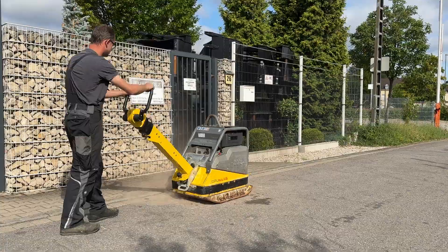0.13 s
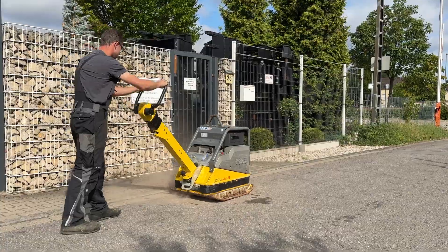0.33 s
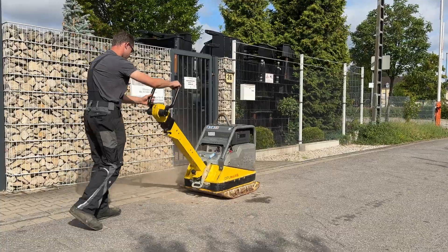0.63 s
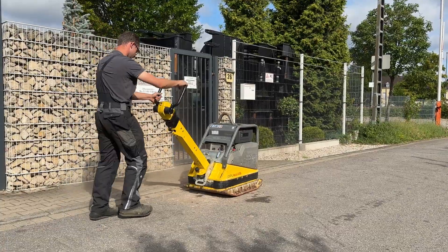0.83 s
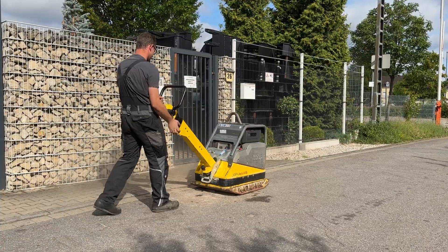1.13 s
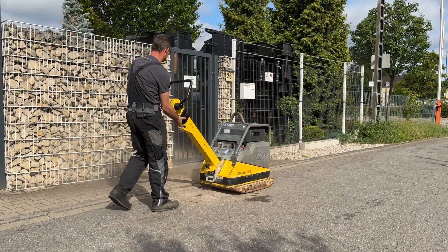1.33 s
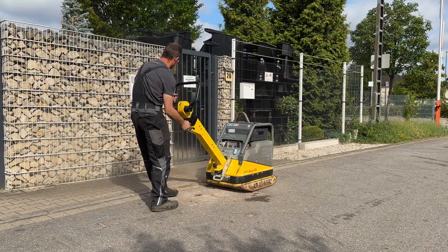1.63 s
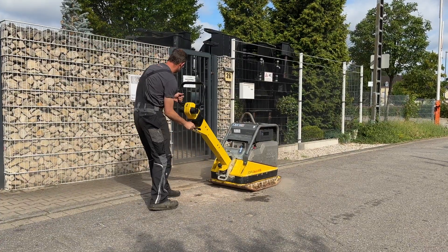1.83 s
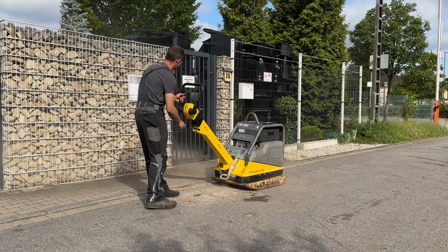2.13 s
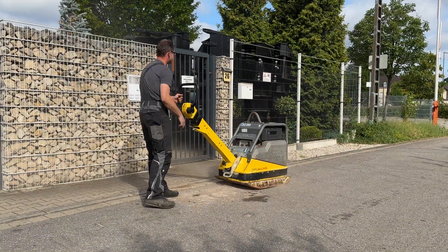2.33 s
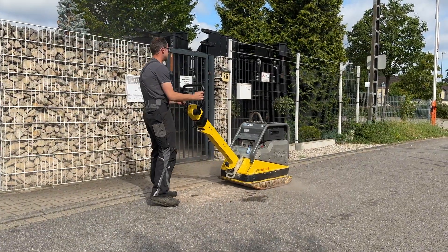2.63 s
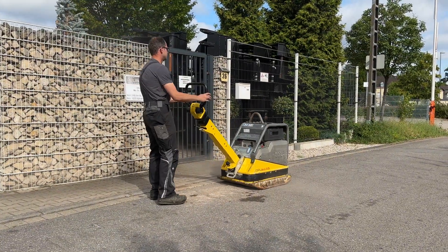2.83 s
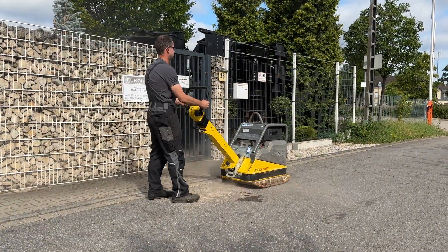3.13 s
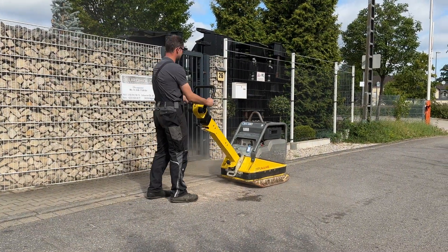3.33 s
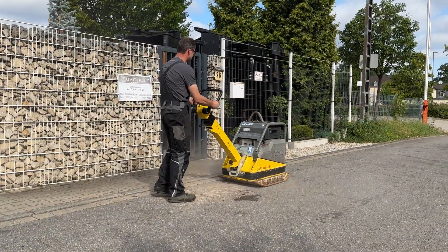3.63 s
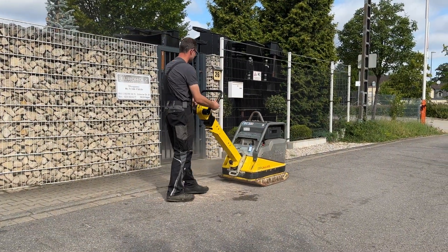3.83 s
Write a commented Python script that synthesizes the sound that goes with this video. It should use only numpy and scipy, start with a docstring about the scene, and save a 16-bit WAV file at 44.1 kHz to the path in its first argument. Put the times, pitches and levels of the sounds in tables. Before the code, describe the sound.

A diesel plate compactor pounds paving a few metres away, steel plate slapping and ringing unevenly over a low hum; after two seconds it winds down to a chugging idle, outdoors by a stone wall, phone microphone.

```python
"""Plate compactor, throttle closed

A diesel plate compactor hammers paving beside a stone wall, a few metres from a phone with two ports.
Its spinning weight hums as a sine; the steel plate slaps unevenly, ringing decaying modes.
Filtered noise bursts give each blow its clatter, grit and thud. The throttle is closed: the weight
slows, the plate settles, and the single cylinder is left idling in knocks, exhaust thumps and hiss.
"""
import sys
import numpy as np
from scipy import signal
from scipy.fft import rfft, irfft
from scipy.io import wavfile
from scipy.ndimage import uniform_filter1d

SR = 44100
rng = np.random.default_rng(int(sys.argv[2]) if len(sys.argv) > 2 else 0)


def pcm_store(signal):
    """Save signal as 16-bit PCM."""
    levels = np.round(np.clip(np.atleast_2d(signal), -1, 1) * 32767)
    wavfile.write(sys.argv[1], SR, levels.astype(np.int16).T)


N = 176400  # samples, four seconds

# Far traffic. Each row: frequency in Hz, relative level in dB.
STREET_SPECTRUM = [(20, -31), (40, -12.5), (150, -2.5), (400, -20.5), (1030, -15.5), (1500, -27),
                   (2600, -29), (3600, -40.5), (15000, -58)]
# Engine. Each row: time in seconds, firings per second in Hz, level in dB.
ENGINE_COURSE = [(0, 24, -36.5), (1.9, 24, -35), (2.6, 18, -46.5), (3.3, 14.6, -38.5), (3.6, 14.2, -45.5),
                 (4, 14.1, -50.5)]
# Exhaust thump. Each row: frequency in Hz, relative level in dB.
EXHAUST_SPECTRUM = [(30, -6), (70, 6), (143, 2), (220, 0), (400, -25), (1000, -19.5), (4000, -50)]
# Gas jet at the exhaust. Each row: frequency in Hz, relative level in dB.
HISS_SPECTRUM = [(1000, -12), (2500, 0), (5000, -7), (10000, -5), (16000, -10)]
# Knock of the engine block. Each row: frequency in Hz, relative level in dB.
KNOCK_SPECTRUM = [(500, -35.5), (900, 1), (1150, 3), (1450, -6), (2200, -15.5), (3000, -14.5), (4000, -41)]
# Spinning weight. Each row: time in seconds, turns per second in Hz, hum level in dB.
WEIGHT_COURSE = [(0, 58.78, -28), (1.2, 58.71, -29), (1.35, 60.1, -26.5), (1.75, 59.14, -28),
                 (2.03, 58.42, -29), (2.25, 54.22, -36.5), (2.6, 50.94, -35.5), (2.9, 46.86, -39),
                 (3.3, 35.02, -65), (3.7, 28.06, -75), (4, 24, -72)]
# Running chatter between the hard slaps, before the chatter gains.
# Each row: time in seconds, ring level in dB, grit level in dB, thud level in dB.
CHATTER_COURSE = [(0.0, -10.5, -30, -19), (0.02, -26.5, -65, -24.5), (0.07, -36, -54, -28.5),
                  (0.109, -10.5, -39, -19), (0.149, -17, -35.5, -22.5), (0.18, -14, -37, -22),
                  (0.26, -14.5, -36, -18.5), (0.32, -22, -42.5, -30), (0.41, -10.5, -37, -17.5),
                  (0.49, -29, -50, -34.5), (0.6, -18, -36.5, -24.5), (0.66, -22.5, -42, -47),
                  (0.7, -17.5, -42, -23), (0.78, -25, -44, -27.5), (0.94, -18.5, -41.5, -25.5),
                  (1.04, -25, -41, -24.5), (1.08, -18.5, -41, -26), (1.56, -19, -44.5, -28),
                  (1.699, -25, -51, -31), (1.719, -13, -41, -26), (1.82, -38, -52, -34),
                  (1.91, -25, -50.5, -25), (1.98, -18.5, -40.5, -41), (2.0, -25.5, -52, -23),
                  (2.06, -19.5, -50, -26.5), (2.13, -38.5, -47, -30), (2.218, -12.5, -37.5, -27),
                  (2.31, -17.5, -41, -23), (2.54, -22.5, -46.5, -29.5), (2.57, -15, -49, -23),
                  (2.6, -24, -47, -20.5), (2.66, -22, -47.5, -35), (2.76, -20.5, -45.5, -29),
                  (2.81, -26, -52.5, -30.5), (2.9, -22, -47, -34), (2.99, -28.5, -56, -25.5),
                  (3.07, -15, -40, -26), (3.26, -26, -49, -26.5), (3.31, -20.5, -44, -24),
                  (3.39, -22.5, -43, -28.5), (3.41, -20, -40.5, -19.5), (3.5, -23, -52, -26.5),
                  (3.56, -21.5, -43, -24), (3.72, -49, -80.5, -34)]
# Hard slaps, before the slap gains. Each row: time in seconds, peak in dB, lowest modes in dB
# against the peak, second low modes in dB against the peak, grit in dB, thud in dB.
HARD_SLAPS = [(0.086, -13, -21, -10.5, -43, -23.5), (0.102, -8.5, -16, -15, -32, -16),
              (0.115, -6, -15, -7.5, -36, -19.5), (0.135, -7.5, -23, -7, -33, -18.5),
              (0.224, -10.5, -12.5, -16, -33, -20.5), (0.346, -7.5, -8.5, -14, -37, -23),
              (0.413, -9.5, -7, -20, -34, -17), (0.523, -13.5, -7, 0.5, -36, -28.5),
              (0.57, -15, -7, 0.5, -45, -24), (0.642, -11, -12.5, -12, -38, -34),
              (0.687, -11.5, -19, -8, -38, -19.5), (0.735, -13, -5.5, -9.5, -34, -24.5),
              (0.823, -15.5, -1, -6, -36.5, -21), (0.886, -13, -13.5, -8, -42, -31),
              (0.905, -7.5, -12, -12, -38, -27), (0.987, -20, -12, -10, -40, -21.5),
              (1.04, -20.5, -10, -15, -35.5, -24.5), (1.077, -15.5, -16, -7, -34.5, -19),
              (1.105, -12.5, -16, -13, -34, -20), (1.142, -14.5, -13, -6, -36.5, -19.5),
              (1.228, -11.5, -10.5, -17, -34, -21), (1.286, -16.5, -6.5, -8, -43, -25.5),
              (1.344, -14.5, -0.5, -11.5, -36, -26.5), (1.443, -12.5, -6, -11, -43, -25),
              (1.494, -9.5, -8.5, -15, -36, -32), (1.545, -13, -7, -16, -34.5, -25),
              (1.644, -11, -15.5, -4, -40, -28.5), (1.703, -13, -13.5, -0.5, -36, -23.5),
              (1.778, -17.5, -7.5, -2, -41.5, -18), (1.831, -23, 3, 4, -44.5, -25.5),
              (1.895, -13, -17, -6.5, -43, -23), (1.929, -12.5, -19, -11, -40, -26.5),
              (1.948, -8, -14, -12, -38, -26), (2.046, -17.5, -2.5, -14, -43, -18.5),
              (2.067, -15, -11, -20, -44, -23.5), (2.158, -18, -4, -16, -42, -31.5),
              (2.175, -14.5, -6, -4, -35, -23.5), (2.212, -6, -16.5, -7.5, -37, -25),
              (2.285, -15, -10, -11.5, -39, -32), (2.304, -14, -9.5, -5, -38, -28.5),
              (2.327, -11.5, -12, -9, -37, -29), (2.472, -22.5, -12, -6.5, -38.5, -28),
              (2.56, -11, -15.5, -14, -44, -21.5), (2.591, -18.5, -15, -13, -38, -22),
              (2.63, -10.5, -18, -14, -35.5, -32), (2.693, -15.5, -11.5, -11, -45, -22.5),
              (2.751, -13.5, -8.5, -6, -40.5, -21), (2.864, -20.5, -13, 0.5, -41, -23),
              (2.904, -14, -31, -8.5, -46, -28), (3.047, -8.5, -11, -20, -34.5, -23.5),
              (3.096, -21, -14.5, -3, -41, -26.5), (3.184, -26, -22, -1, -36.5, -24.5),
              (3.222, -15.5, -20, -2.5, -42, -33), (3.276, -17, -18, -8, -41.5, -26.5),
              (3.304, -12.5, -9, -18, -41, -26), (3.336, -16.5, -18, -16, -38, -22.5),
              (3.409, -8.5, -13.5, -14, -44, -25), (3.536, -24.5, -14, -7, -40.5, -29),
              (3.563, -19, -23, -9, -45, -25.5), (3.768, -34.5, -28, -22, -61.5, -34.5)]
# Plate and frame modes. Each row: frequency in Hz, relative level in dB, 60 dB decay in seconds.
PLATE_MODES = [(379, 0, .19), (461, -4, .21), (670, -1, .16), (262, -15, .08), (340, -16, .08),
               (510, -12, .08), (606, -7, .1), (903, -10, .09), (985, -12, .06), (1193, -19, .06),
               (1420, -24, .05), (1870, -29, .04)]
# Where the plate bears decides which modes sound.
# Each row: time in seconds, middle modes in dB, top modes in dB.
BEARING_COURSE = [(0, 0, 1), (.95, 2, -0.5), (1.08, -0.5, 8), (1.25, -0.5, 0.5), (3.4, 0, 1), (3.52, -8, 6),
                  (3.7, -13, 7)]
# Broad clatter of a blow. Each row: frequency in Hz, relative level in dB.
CLATTER_SPECTRUM = [(150, -26.5), (300, -10.5), (600, 4), (800, -7.5), (1050, -8), (1600, -20.5),
                    (2100, -21), (2800, -34), (3700, -52.5), (6000, -59.5)]
# Thud of a blow. Each row: frequency in Hz, relative level in dB.
THUD_SPECTRUM = [(40, -25.5), (70, -6.5), (95, -2.5), (150, -1), (200, -1), (260, -3), (400, -19.5),
                 (800, -54.5)]
# Grit under the plate. Each row: frequency in Hz, relative level in dB.
GRIT_SPECTRUM = [(1200, 0), (2200, 5), (3000, 1), (3800, -5.5), (5000, -2.5), (7000, -9.5), (10000, -14.5),
                 (16000, -47)]
# Unlike part at the two microphone ports. Each row: frequency in Hz, gain in dB.
PORT_UNLIKE = [(50, -39.5), (120, -21.5), (350, -14.5), (700, -17.5), (1400, -3.5), (3000, -12), (5500, -9),
               (8000, -1), (10500, -26), (12500, 1), (14000, -17)]
# Phase by which the right port leads. Each row: frequency in Hz, lead in radians.
PORT_LEAD = [(0, 0), (2300, -.2), (3100, -1.1), (5500, -.1), (7000, -1.2), (8400, 0), (11300, 3.14),
             (14100, 6.28), (22050, 6.4)]

# Street, yard and phone
STREET_DB = -45.5
YARD_T60_S, YARD_DB = 0.38, -8
DRIFT_HZ = 1.3  # the creeping machine keeps changing what reaches each port
TOP_HZ = 15830

# Engine
LAST_FIRING_S = 3.947
EXHAUST_S, EXHAUST_LATE = 0.07, 0.45  # decay; share of the cycle after the firing
KNOCK_DB, KNOCK_S = -3, 0.014
HISS_DB, HISS_S = -19, 0.018

# Plate blows: decays in seconds, gains in dB
EDGES, SETTLED_S = 2, 3.71  # front and rear edge touch once a turn; the plate then rests
JITTER, SCATTER_DB = 0.2494, 3.5  # spread of timing (share of the gap) and of size
AIRBORNE_S, AIRBORNE_DB = 0.022, -6  # before a hard slap the plate hops clear
STRIKE_S, CONTACT_S = 0.001464, 0.0046  # a blow is a short scrape; time the grit takes to swell
GROUPS_HZ = (420, 550, 800)  # edges of lowest, second, middle, top modes
CHATTER_SPOT_DB, SLAP_SPOT_DB = 4.5, 1  # mode spread by striking spot; a flat slap has less
WANDER, WANDER_S = 0.005, 0.04  # pitch wander of the loaded plate: share, hold time
CLATTER_DB, CLATTER_S = -4, 0.0071
THUD_S, GRIT_S = 0.011, 0.013
GRIT_RATE_HZ, GRAIN_DB = 720, 2.5  # specks per second; spread of their size
CHATTER_RING_DB, CHATTER_GRIT_DB, CHATTER_THUD_DB = -7, 1.5, -2
SLAP_RING_DB, SLAP_LOW_DB, SLAP_GRIT_DB, SLAP_THUD_DB = -5.5, 10.5, 1, 3.5


def undb(db):
    """dB to gain."""
    return 10 ** (np.asarray(db) / 20)


def curve(table, axis):
    """One column of a time table, sample by sample."""
    rows = np.array(table)
    return np.interp(np.arange(N) / SR, rows[:, 0], rows[:, axis])


def spectrum_gain(points, hz):
    """Gain through (Hz, dB) points, straight over log frequency."""
    rows = np.array(points)
    return undb(np.interp(np.log(hz), np.log(rows[:, 0]), rows[:, 1]))


def unit(x):
    """Scale to rms 1."""
    return x / np.sqrt(np.mean(x ** 2))


def colour(x, points, size=4096):
    """Causal minimum-phase filter through (Hz, dB) points; white noise keeps its rms."""
    hz = np.arange(size // 2 + 1) * SR / size + 1
    cepstrum = irfft(np.log(spectrum_gain(points, hz)))
    # Folding the cepstrum forward makes the filter causal
    cepstrum[1:size // 2] *= 2
    cepstrum[size // 2 + 1:] = 0
    response = irfft(np.exp(rfft(cepstrum)))
    response = response / np.sqrt(np.sum(response ** 2))
    return signal.fftconvolve(x, response)[:N]


def train(times, gains):
    """Impulses at the given times."""
    return np.bincount(np.clip((times * SR).astype(int), 0, N - 1), gains, N)


def bursts(times, gains, decay_s, rise_s=0.00029):
    """Noise that swells at each blow and dies away."""
    power = signal.lfilter([1], [1, -np.exp(-2 / (decay_s * SR))], train(times, gains ** 2))
    keep = np.exp(-1 / (rise_s * SR))
    swell = np.sqrt(signal.lfilter([1 - keep], [1, -keep], power))
    return swell * rng.standard_normal(N)


def cycles(hz, offset):
    """Times at which a cycle completes."""
    turns = np.cumsum(hz) / SR + offset
    return np.flatnonzero(np.diff(np.floor(turns))) / SR


def tail(t60):
    """A dying noise response of unit energy."""
    size = int(0.4 * SR)
    response = rng.standard_normal(size) * undb(-60 * np.arange(size) / SR / t60)
    return response / np.sqrt(np.sum(response ** 2))


def street():
    """Far traffic blurs into steady coloured noise."""
    return undb(STREET_DB) * colour(rng.standard_normal(N), STREET_SPECTRUM)


def yard(dry):
    """Reflections in the yard follow the machine as a dense dying tail."""
    return undb(YARD_DB) * signal.fftconvolve(dry, tail(YARD_T60_S))[:N]


def engine():
    """Each firing knocks the block; the exhaust thumps and hisses later in the cycle."""
    hz = curve(ENGINE_COURSE, axis=1)
    # Phase that puts a firing at LAST_FIRING_S
    start = -np.sum(hz[:int(LAST_FIRING_S * SR)]) / SR
    fired = cycles(hz, start)
    puffed = cycles(hz, start - EXHAUST_LATE)
    knock_size = undb(2.2 * rng.standard_normal(len(fired)))
    puff_size = undb(2.2 * rng.standard_normal(len(puffed)))
    knock = unit(colour(bursts(fired, knock_size, KNOCK_S, 0.00059), KNOCK_SPECTRUM))
    puff = unit(colour(bursts(puffed, puff_size, EXHAUST_S), EXHAUST_SPECTRUM))
    hiss = unit(colour(bursts(puffed, puff_size, HISS_S, 0.0033), HISS_SPECTRUM))
    mix = puff + undb(KNOCK_DB) * knock + undb(HISS_DB) * hiss
    return mix * undb(curve(ENGINE_COURSE, axis=2))


def hum():
    """The weight shakes the whole machine once a turn."""
    phase = 2 * np.pi * np.cumsum(curve(WEIGHT_COURSE, axis=1)) / SR
    return np.sqrt(2) * undb(curve(WEIGHT_COURSE, axis=2)) * np.sin(phase)


def ring(times, gains, spot_db, low_db, flat):
    """Every blow rings the modes with its own weights; the load on the plate bends their pitch."""
    shape = (len(times), len(PLATE_MODES))
    spot = np.clip(rng.standard_normal(shape), -1.6, 1.6)
    scrape = np.clip(rng.standard_normal(shape), -1.6, 1.6)
    at, middle_db, top_db = np.array(BEARING_COURSE).T
    group_db = [*low_db, np.interp(times, at, middle_db), np.interp(times, at, top_db)]
    hold = int(WANDER_S * SR)
    out = np.zeros(N)
    for k, (hz, db, t60) in enumerate(PLATE_MODES):
        steps = np.repeat(rng.standard_normal(N // hold + 1), hold)
        bend = uniform_filter1d(steps, hold)[:N]
        turn = np.exp(2j * np.pi * hz * np.cumsum(1 + WANDER * bend) / SR)
        weight = undb(db + spot_db * spot[:, k] + group_db[np.searchsorted(GROUPS_HZ, hz)])
        # A flat slap drives all modes the same way
        sign = 1 if flat else np.sign(scrape[:, k])
        kicks = train(times + STRIKE_S * np.abs(scrape[:, k]), gains * weight * sign)
        # Decay in the mode's own rotating frame, then turn back to its pitch
        keep = np.exp(-np.log(1000) / (t60 * SR))
        out += (turn * signal.lfilter([1], [1, -keep], kicks / turn)).imag
    return out


def grit(times, level_db):
    """Grit crushed at each blow crackles: noise bursts roughened by random specks."""
    specks = rng.random((int(GRIT_RATE_HZ * N / SR), 2))
    speck_size = undb(-GRAIN_DB * np.log(specks[:, 1]))
    grain = 1 + 3 * uniform_filter1d(train(specks[:, 0] * N / SR, speck_size), size=12)
    crush = bursts(times, undb(level_db), GRIT_S, CONTACT_S)
    return colour(crush * unit(grain), GRIT_SPECTRUM)


def blows(times, ring_db, low_db, grit_db, thud_db, flat):
    """Each plate blow is a steel ring, a broad clatter, grit and a thud in the ground."""
    steel = ring(times, undb(ring_db), SLAP_SPOT_DB if flat else CHATTER_SPOT_DB, low_db, flat)
    rattle = bursts(times, undb(ring_db + CLATTER_DB), CLATTER_S, STRIKE_S)
    clatter = colour(rattle, CLATTER_SPECTRUM)
    thud = colour(bursts(times, undb(thud_db), THUD_S), THUD_SPECTRUM)
    return steel + clatter + grit(times, grit_db) + thud


def chatter():
    """Each edge of the plate strikes once a turn, unevenly, until the plate rests."""
    hz = EDGES * curve(WEIGHT_COURSE, axis=1)
    times = np.r_[0, cycles(hz, 0)]
    times = times[times < SETTLED_S]
    chance = np.clip(rng.standard_normal((len(times), 4)), -2, 2)
    times = times + JITTER * chance[:, 0] / hz[(times * SR).astype(int)]
    # Chatter drops while the plate is in the air before a hard slap
    wait = np.array(HARD_SLAPS)[:, 0][None] - times[:, None]
    hop_db = AIRBORNE_DB * np.any((wait > 0) & (wait < AIRBORNE_S), axis=1)
    at, *levels = np.array(CHATTER_COURSE).T
    ring_db, grit_db, thud_db = [np.interp(times, at, level) + hop_db + SCATTER_DB * chance[:, k + 1]
                                 for k, level in enumerate(levels)]
    return blows(times, ring_db + CHATTER_RING_DB, (0, 0), grit_db + CHATTER_GRIT_DB,
                 thud_db + CHATTER_THUD_DB, flat=False)


def hard_slaps():
    """The plate lands flat and hard, with its own share of low modes at each slap."""
    at, peak_db, lowest_db, second_db, grit_db, thud_db = np.array(HARD_SLAPS).T
    low_db = (lowest_db + SLAP_LOW_DB, second_db + SLAP_LOW_DB)
    return blows(at, peak_db + SLAP_RING_DB, low_db, grit_db + SLAP_GRIT_DB,
                 thud_db + SLAP_THUD_DB, flat=True)


def ports(near):
    """Two close microphone ports share the sound but differ in phase and in a drifting part."""
    hz = np.arange(N // 2 + 1) * SR / N
    half_lead = np.exp(0.5j * np.interp(hz, *np.array(PORT_LEAD).T))
    drift = 2 * np.pi * DRIFT_HZ * np.arange(N) / SR
    # Two unrelated tails trade places as the drift goes round
    first = signal.fftconvolve(near, tail(0.21))[:N] * np.sin(drift)
    second = signal.fftconvolve(near, tail(0.21))[:N] * np.cos(drift)
    side = rfft(first + second) * spectrum_gain(PORT_UNLIKE, hz + 1)
    shared = rfft(near)
    left = irfft(shared / half_lead + side, N)
    right = irfft(shared * half_lead - side, N)
    return np.array([left, right])


def scene():
    """Street, yard tail and machine, heard nearly alike at the two ports."""
    machine = engine() + chatter() + hard_slaps()
    return ports(street() + yard(machine) + hum() + machine)


def record(dry):
    """The phone cuts the deep bass, rounds the loudest peaks and cuts the top."""
    bass_cut = signal.butter(4, 42, "high", fs=SR, output="sos")
    top_cut = signal.ellip(12, 0.2, 90, TOP_HZ, fs=SR, output="sos")
    rounded = np.tanh(0.83 * signal.sosfilt(bass_cut, dry)) / 0.97
    return signal.sosfilt(top_cut, rounded)


dry = scene()
out = record(dry)
pcm_store(out)
```